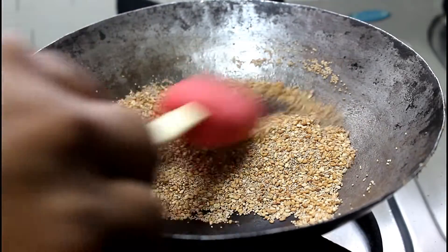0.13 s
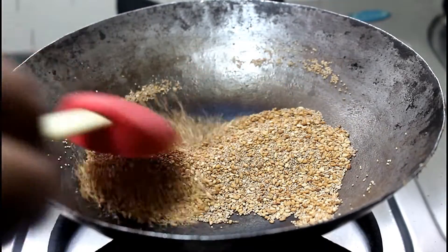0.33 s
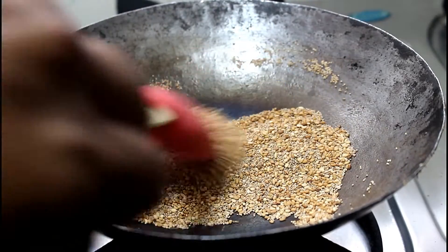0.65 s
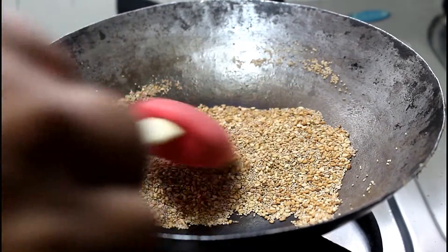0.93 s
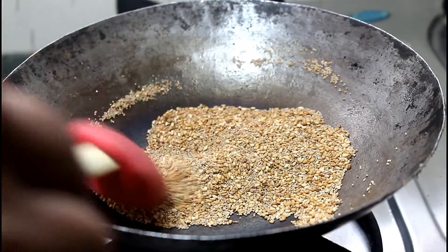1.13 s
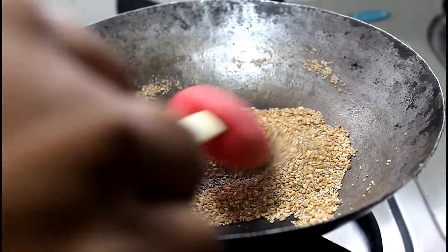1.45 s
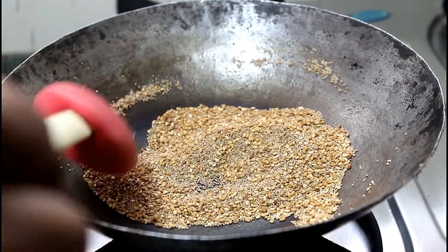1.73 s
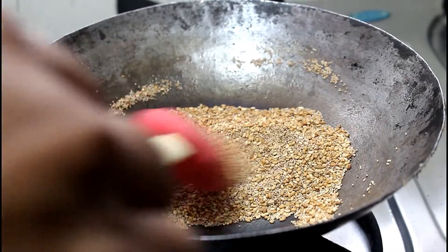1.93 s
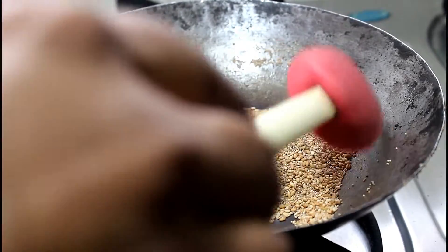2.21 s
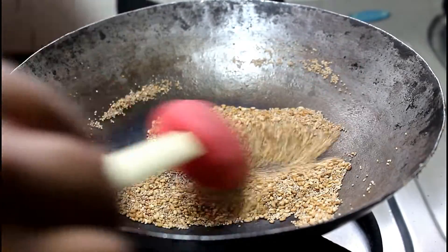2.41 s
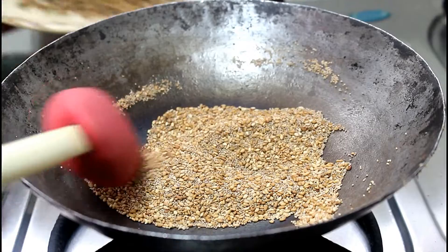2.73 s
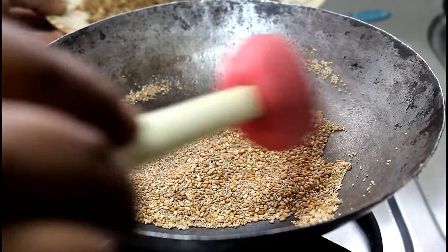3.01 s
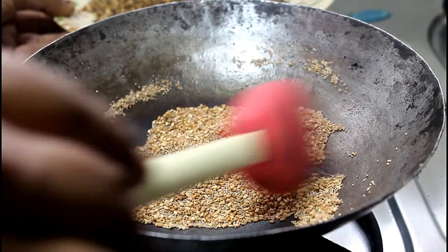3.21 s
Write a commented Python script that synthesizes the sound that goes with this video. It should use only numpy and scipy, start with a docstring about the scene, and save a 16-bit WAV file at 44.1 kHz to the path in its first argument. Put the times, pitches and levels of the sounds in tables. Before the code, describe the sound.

Roasting seeds pop in an iron pan with dry, sharp ticks, sparse at first, strong near 0.4, 0.75 and 1.9 seconds, denser from 2.4. A spatula scrapes with bright, squeaky hisses at 0.15-0.5, 0.6 and 2.4, and sweeps seeds in grainy swishes around 1.25-1.5 and 1.95. At 3.0 the pan knocks, rattling until 3.15. Faint flame, soft rustling, close microphone, small kitchen.

```python
"""In a small kitchen, seeds roast in an iron pan over a gas flame, and single seeds pop with sharp ticks.
A silicone spatula stirs: the heap rustles, seeds hiss and squeak over the metal or are swept across it.
Near the end the pan knocks and rattles on its stand. Flame, rub and swish are coloured noise and grains,
squeaks are gliding tones, pops are damped clicks, and knocks are noise bursts with ringing pan modes."""
import sys
import numpy as np
from scipy import signal
from scipy.fft import rfft, irfft
from scipy.io import wavfile

SR = 44100
rng = np.random.default_rng(int(sys.argv[2]) if len(sys.argv) > 2 else 0)


def output_pcm(signal):
    """Save a mono or channel-first signal as 16-bit PCM at the path in sys.argv[1].

    Samples are clipped to [-1, 1] before scaling.
    """
    pcm = np.clip(np.atleast_2d(signal).T, -1, 1) * 32767
    wavfile.write(sys.argv[1], SR, np.round(pcm).astype(np.int16))


N = 147735
T = np.arange(N) / SR   # time in seconds


def from_db(db):
    """Decibels to gain."""
    return 10 ** (np.asarray(db) / 20)


def rms_one(x):
    """Scale to unit rms over the whole sound."""
    return x / np.sqrt(np.mean(x ** 2) + 1e-20)


def lowpass(x, hz, order=2):
    """Soften everything above an edge."""
    return signal.sosfilt(signal.butter(order, hz, fs=SR, output="sos"), x)


def highpass(x, hz, order=2):
    """Thin out everything below an edge."""
    return signal.sosfilt(signal.butter(order, hz, "high", fs=SR, output="sos"), x)


def band(x, hz, width_hz, order):
    """Band-pass about a fixed centre."""
    edges = np.clip([hz - width_hz / 2, hz + width_hz / 2], 20, .48 * SR)
    return signal.sosfilt(signal.butter(order, edges, "band", fs=SR, output="sos"), x)


def moving_band(x, hz, width_hz, order):
    """Band-pass about a centre that moves in time; rms 1."""
    turn = np.exp(2j * np.pi * np.cumsum(hz) / SR)
    # turn the centre down to 0 Hz, low-pass there, turn it back up
    around_zero = lowpass(x / turn, width_hz / 2, order)
    return rms_one(np.real(turn * around_zero))


def colour(x, points):
    """Shape a steady sound with a spectrum drawn over log frequency; rms 1."""
    hz, db = np.transpose(points)
    log_hz = np.log(np.fft.rfftfreq(N, 1 / SR) + 1)
    gain = from_db(np.interp(log_hz, np.log(hz), db))
    return rms_one(irfft(rfft(x) * gain, N))


def wobble(hz):
    """Low-passed noise as a random wobble; rms 1."""
    return rms_one(lowpass(rng.standard_normal(N), hz))


def add(out, s, x):
    """Mix a short sound in at a time."""
    i = int(np.clip(s * SR, 0, N - 1))
    out[i:i + len(x)] += x[:N - i]


def dying(noise, t60):
    """One second of noise dying away; energy 1."""
    x = noise[:SR] * from_db(-60 * T[:SR] / t60)
    return x / np.sqrt(np.sum(x ** 2))


TREBLE_HZ = 8900   # treble above this dies at its own rate


def echoes(x, db, t60, delay_s, treble_t60):
    """Add dense reflections that die away, the treble at its own rate."""
    noise = rng.standard_normal(SR)
    low = signal.sosfiltfilt(signal.butter(2, TREBLE_HZ, fs=SR, output="sos"), noise)
    extra_loss = max(1 / treble_t60 - 1 / t60, 0)
    high = (noise - low) * from_db(-60 * T[:SR] * extra_loss)
    tail = dying(low + high, t60)
    response = np.r_[np.zeros(int(delay_s * SR)), tail]
    return x + from_db(db) * signal.fftconvolve(x, response)[:len(x)]


ROOM_DB, KNOCK_ROOM_DB = -5.5, -3.5   # room level for the seeds and for the knocks
ROOM_T60_S, ROOM_DELAY_S, TREBLE_T60_S = 0.31, .003, 0.25   # the room's treble dies sooner


def kitchen(x, db=ROOM_DB):
    """Wall echoes of the room, with a fresh pattern for every sound sent in."""
    return echoes(x, db, ROOM_T60_S, ROOM_DELAY_S, TREBLE_T60_S)


CLUMP_DB, CLUMP_HZ = 3.5, 110   # the seeds move in small jerks: depth and speed
GRAINS_PER_S, GRAIN_SPREAD_DB = 5000, 0.5   # seed contacts: rate, spread of sizes


def grains(per_s=GRAINS_PER_S, spread_db=GRAIN_SPREAD_DB):
    """Seed contacts of uneven size, in clumps; rms 1."""
    sizes = from_db(spread_db * np.minimum(rng.exponential(1, N), 4)) * rng.choice([-1, 1], N)
    clumps = from_db(CLUMP_DB * wobble(CLUMP_HZ))
    hits = rng.random(N) < per_s / SR
    return rms_one(sizes * clumps * hits) + 1e-18


STROKE_RANGE_DB = 23.5   # the fade has lost twice this after one fall time


def stroke(start, rise, fall):
    """A push swells smoothly to its peak, then fades faster and faster."""
    swell = np.sin(np.pi / 2 * np.clip((T - start) / rise, 0, 1)) ** 2
    spent = np.maximum(T - start - rise, 0) / fall
    return swell * from_db(-STROKE_RANGE_DB * (spent + spent ** 2))


# The breath of the gas flame. Each row: frequency in Hz, relative level in dB.
FLAME_COLOUR = [(25, -26), (45, -32.5), (70, -10.5), (120, -17.5), (190, 1), (330, -1.5), (600, -8),
                (1200, 1), (2500, -6.5), (5000, -21.5), (9000, -33.5), (16000, -61)]
FLAME_DB = -62   # rms level


def flame():
    """Turbulent burning gas is a steady coloured noise."""
    return from_db(FLAME_DB) * colour(rng.standard_normal(N), FLAME_COLOUR)


# The pan meets its stand. Each row: time in seconds, relative level in dB.
STAND_KNOCKS = [(2.9835, -2.5), (2.9893, 0), (2.9952, -7), (2.9995, -6), (3.038, -22), (3.065, -8.5),
                (3.098, -8.5), (3.118, -9.5), (3.131, -9.5), (3.143, -13)]
# Tone of the clatter. Each row: frequency in Hz, relative level in dB.
CLATTER_COLOUR = [(40, -6), (120, -28), (200, -9), (320, -3), (430, -6), (540, 3.5), (850, 2.5),
                  (1400, -0.5), (2000, 1), (2700, -7), (4000, -9.5), (6000, -20), (9000, -32), (16000, -77)]
# Ringing modes of the pan. Each row: frequency in Hz, relative level in dB, 60 dB decay time in seconds.
PAN_MODES = [(339, 9, 0.11), (545.2, 0.5, 0.37), (700, -1, 0.27), (950, -8, 0.23), (992, 15, 0.1),
             (1086, 1, 0.22), (1260, -13, .3), (1460, 2, 0.25), (1770, -9, 0.27), (1880, 7, 0.34),
             (1945, 4, 0.14), (3050, -5, 0.1)]
CLATTER_T60_S, CLATTER_DB, RING_DB = 0.073, 4, -45.5   # decay of the clatter; levels of clatter and ring
KNOCK_LOW_HZ = 218   # the pan radiates little bass


def knocks():
    """Each contact gives a short dense clatter and rings the pan's modes."""
    out, t = np.zeros(N), T[:SR]
    hz, mode_db, t60 = np.transpose(PAN_MODES)[:, :, None]
    modes = from_db(mode_db + RING_DB - 60 * t / t60) * np.sin(2 * np.pi * hz * t)
    noise = colour(rng.standard_normal(N), CLATTER_COLOUR)
    for k, (s, db) in enumerate(STAND_KNOCKS):
        # each knock strikes the modes a little differently
        strengths = from_db(rng.normal(0, 1, len(PAN_MODES))) * rng.choice([-1, 1], len(PAN_MODES))
        clatter = dying(np.roll(noise, k * SR // 10), CLATTER_T60_S)
        add(out, s, from_db(db) * (from_db(CLATTER_DB) * clatter + strengths @ modes))
    return highpass(kitchen(out, KNOCK_ROOM_DB), KNOCK_LOW_HZ)


# Push of the spatula in the heap. Each row: time in seconds, relative level in dB.
STIR_PUSH = [(0, -53), (.11, -61.5), (.16, -49.5), (.2, -46), (.26, -52.5), (.4, -54.5), (.55, -58.5),
             (.66, -47), (.75, -51.5), (.82, -63), (.91, -75), (.97, -64.5), (1.13, -54.5), (1.19, -59.5),
             (1.24, -55), (1.37, -49.5), (1.55, -57), (1.63, -53), (1.78, -59), (1.9, -49), (2.02, -76.5),
             (2.11, -57.5), (2.36, -53), (2.7, -55.5), (2.85, -53), (3.28, -53.5), (3.35, -45.5)]
# Soft bumps of the blade in the heap. Each row: time in seconds, relative level in dB.
BLADE_BUMPS = [(0.967, -52.5), (1.003, -55.5), (2.367, -60), (2.61, -49.5)]
# Tone of the broad rustle. Each row: frequency in Hz, relative level in dB.
HEAP_COLOUR = [(200, -20.5), (400, -10), (700, -8.5), (950, -0.5), (1800, -1), (2400, -15), (3400, -12),
               (4500, -23.5), (8000, -47.5)]
BUMP_S = 0.0031   # time from a bump's peak to 1/e
RUB_HZ, RUB_HZ_PER_DB, RUB_WIDTH_HZ = 1212, 29, 580   # rub resonance: mean centre, rise with the push, width
RUB_BAND_DB, RUSTLE_DB = -4.5, -2.5   # levels of that resonance and of the broad rustle


def rustle():
    """The dull rub of the heap grows louder and brighter with the push, with a few soft bumps."""
    push_db = np.interp(T, *np.transpose(STIR_PUSH))
    push = from_db(push_db)
    for s, db in BLADE_BUMPS:
        push = push + from_db(db) * np.exp(-((T - s) / BUMP_S) ** 2)
    centre = RUB_HZ + RUB_HZ_PER_DB * (push_db - push_db.mean())
    rub = moving_band(grains(), centre, RUB_WIDTH_HZ, order=3)
    broad = colour(grains(), HEAP_COLOUR)
    return push * (from_db(RUSTLE_DB) * broad + from_db(RUB_BAND_DB) * rub)


# The blade squeaks. Each row: start in seconds, length in seconds, start pitch in Hz, end pitch in Hz,
# relative level in dB.
BLADE_SQUEAKS = [(0.136, 0.048, 6900, 6380, -44.5), (0.297, 0.045, 6910, 5300, -36),
                 (0.594, 0.013, 6100, 6170, -44), (0.629, 0.053, 6380, 6330, -46),
                 (1.453, 0.029, 5340, 5280, -37), (2.914, 0.05, 4760, 5370, -46),
                 (2.929, 0.057, 5260, 4920, -43)]
ROUGHNESS_HZ = 280   # how fast squeaks waver in level and phase


def squeaks():
    """Stick-slip gives short, rough, gliding whistles."""
    out = 0
    for s, length, start_hz, end_hz, db in BLADE_SQUEAKS:
        along = np.clip((T - s) / length, 0, 1)
        phase = 2 * np.pi * np.cumsum(start_hz + (end_hz - start_hz) * along) / SR
        a, b = rms_one(lowpass(rng.standard_normal((2, N)), ROUGHNESS_HZ))
        whistle = a * np.cos(phase) + b * np.sin(phase)
        out = out + from_db(db) * np.sin(np.pi * along) * whistle
    return out


# The heap is swept over the pan. Each row: start in seconds, rise in seconds, fall in seconds,
# relative level in dB, lower edge in Hz, upper edge in Hz (held below 0.45 of the sample rate).
SWEEP_STROKES = [(0.225, 0.072, 0.2, -47, 10000, 13000), (1.185, 0.12, 0.087, -50, 2400, 3000),
                 (1.25, 0.0093, 0.09, -39, 4600, 9100), (1.268, 0.037, 0.29, -33.5, 3700, 6700),
                 (1.264, 0.13, 0.13, -37.5, 2900, 7400), (1.374, 0.086, 0.18, -40, 2670, 5300),
                 (1.8, 0.13, 0.053, -53, 2000, 5400), (1.935, 0.002, 0.067, -33, 4200, 8800),
                 (1.933, 0.13, 0.28, -45.5, 4300, 25000)]
# Tone of the swish. Each row: frequency in Hz, relative level in dB.
SWISH_COLOUR = [(1500, 6), (3000, 1), (4200, 2), (5500, 1), (7500, 1), (10000, -4), (13000, -18.5),
                (16000, -35.5)]
# single seeds landing: rate, level against the dense contacts, spread of sizes
PATTER_PER_S, PATTER_DB, PATTER_SPREAD_DB = 200, -5.5, -1.5


def sweeps():
    """Many loose seeds tumble over the iron; single ones patter out of the swish."""
    out = 0
    for start, rise, fall, db, low_hz, high_hz in SWEEP_STROKES:
        patter = from_db(PATTER_DB) * grains(PATTER_PER_S, PATTER_SPREAD_DB)
        swish = highpass(colour(grains() + patter, SWISH_COLOUR), low_hz, order=3)
        swish = lowpass(swish, min(high_hz, .45 * SR))
        out = out + from_db(db) * stroke(start, rise, fall) * rms_one(swish)
    return out


# Seeds pressed along the metal. Each row: start in seconds, rise in seconds, fall in seconds,
# relative level in dB, centre at the peak in Hz, width in Hz.
SCRAPE_STROKES = [(0, 0.0038, 0.16, -52, 5370, 1280), (0, 0.0087, 0.22, -57.5, 7330, 2300),
                  (0.149, 0.00696, 0.025, -27.5, 7300, 2550), (.17, 0.059, 0.22, -40, 7380, 1700),
                  (.225, 0.043, 0.1, -30.5, 7350, 1581), (0.279, 0.049, 0.35, -35, 7330, 2200),
                  (.574, 0.013, 0.047, -34.5, 6630, 1400), (0.601, 0.072, 0.17, -39.5, 6460, 1599),
                  (0.781, 0.1, 0.48, -67.5, 3350, 457), (1.1, 0.035, 0.079, -64, 3130, 1170),
                  (1.831, 0.16, 0.14, -53.5, 7700, 2700), (2.404, 0.016, 0.2, -36.5, 7550, 1880),
                  (2.46, 0.079, 0.15, -47, 6770, 2120), (3.29, 0.077, 0.11, -51, 7580, 2030)]
SCRAPE_SAG = 0.063   # share of its pitch that a scrape loses over the fall as the blade slows
SCRAPE_SKIRT_DB, SCRAPE_DB = -14.5, -2   # broad grit around each scrape; level of all scrapes
# half-formed squeaks: level, swing as a share of the width, speed
SING_DB, SING_WANDER, SING_WANDER_HZ = -2.5, 0.36, 30.2


def scrapes():
    """Seeds sliding under the blade hiss in a sinking high band, with broad grit and wandering squeaks."""
    out, contacts = 0, grains()
    singers = [(wobble(SING_WANDER_HZ), wobble(ROUGHNESS_HZ)) for _ in range(2)]
    for start, rise, fall, db, hz, width_hz in SCRAPE_STROKES:
        centre = hz * (1 - SCRAPE_SAG * np.clip((T - start - rise) / fall, -1, 1))
        hiss = moving_band(contacts, centre, width_hz, order=3)
        grit = rms_one(band(band(contacts, hz, 5000, order=1), hz, 5000, order=1))
        sing = 0
        for wander, grip in singers:
            pitch = centre + SING_WANDER * width_hz * wander
            sing = sing + grip * np.sin(2 * np.pi * np.cumsum(pitch) / SR)
        scrape = hiss + from_db(SCRAPE_SKIRT_DB) * grit + from_db(SING_DB) * sing
        out = out + from_db(db + SCRAPE_DB) * stroke(start, rise, fall) * scrape
    return out


STIRRING_DB = -1.5   # level of all the stirring


def stirring():
    """The spatula's work: scrapes, sweeps, squeaks and rustle, sent through the room in three groups."""
    return from_db(STIRRING_DB) * (kitchen(scrapes()) + kitchen(sweeps()) + kitchen(squeaks() + rustle()))


# A seed bursts. Each row: time in seconds, relative peak level in dB, pitch in Hz.
SEED_POPS = [(0.404, -13.5, 8140), (0.5709, -34.5, 7700), (0.6343, -23.5, 7400), (.7568, -13.5, 7700),
             (1.094, -47, 8300), (1.2576, -18, 7170), (1.3414, -16, 7140), (1.411, -21, 5550),
             (1.641, -46, 6460), (1.7077, -34, 7750), (1.7517, -32.5, 8060), (1.786, -38, 7200),
             (1.9318, -9.5, 7120), (2.1346, -26.5, 6640), (2.208, -27.5, 5660), (2.409, -23.5, 6600),
             (2.4475, -14, 6600), (2.4518, -10, 6440), (2.5583, -26, 6900), (2.606, -18.5, 8260),
             (2.6752, -23, 7570), (2.7848, -18, 7130), (2.8177, -26.5, 6750), (2.911, -26.5, 7540),
             (2.9471, -12, 7760), (2.9946, -12.5, 6500), (3.144, -25, 7100), (3.2602, -33, 7500)]
POP_WIDTH, POP_DB = 0.61, 1   # bandwidth as a share of the pitch; level of all pops
BOWL_DB, BOWL_T60_S = -5.5, 0.03   # quick echoes inside the pan


def pops():
    """Each burst hull is one heavily damped click, echoed by the bowl and the room."""
    out, impulse = np.zeros(N), signal.unit_impulse(SR // 2) + 1e-18
    for s, db, hz in SEED_POPS:
        click = band(band(impulse, hz, POP_WIDTH * hz, order=1), hz, POP_WIDTH * hz, order=1)
        in_bowl = echoes(click / abs(click).max(), BOWL_DB, BOWL_T60_S, .0003, BOWL_T60_S)
        add(out, s, from_db(db + POP_DB) * kitchen(in_bowl))
    return out


def scene():
    """Flame, stand, stirring and pops together, the same in both ears."""
    x = flame() + knocks() + stirring() + pops()
    return np.array([x, x])


MIC_TOP_HZ, CUTOFF_HZ = 12600, 16300   # gentle and steep treble limits


def record(dry):
    """The microphone softens the highest treble; the top is cut steeply."""
    soft = lowpass(dry, MIC_TOP_HZ)
    return signal.sosfilt(signal.ellip(10, .1, 80, CUTOFF_HZ, fs=SR, output="sos"), soft)


dry = scene()
out = record(dry)
output_pcm(out)
```